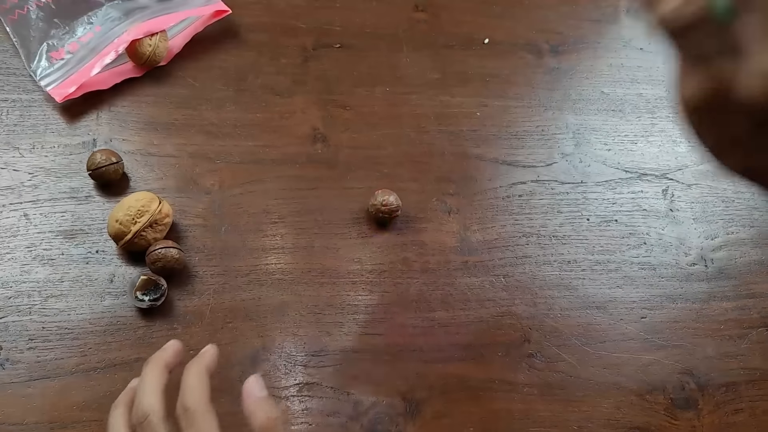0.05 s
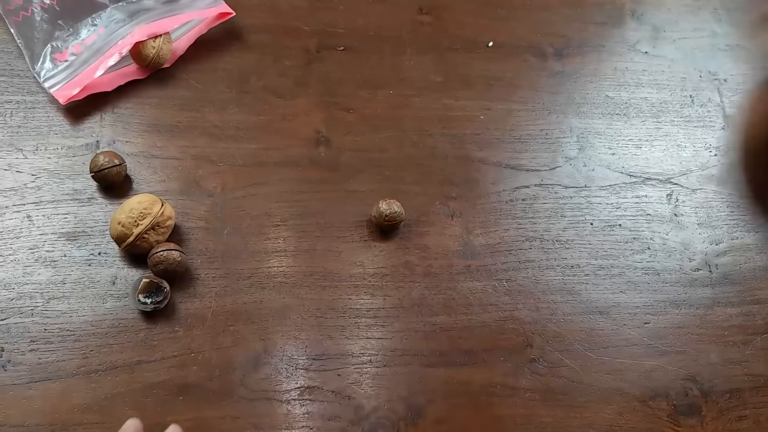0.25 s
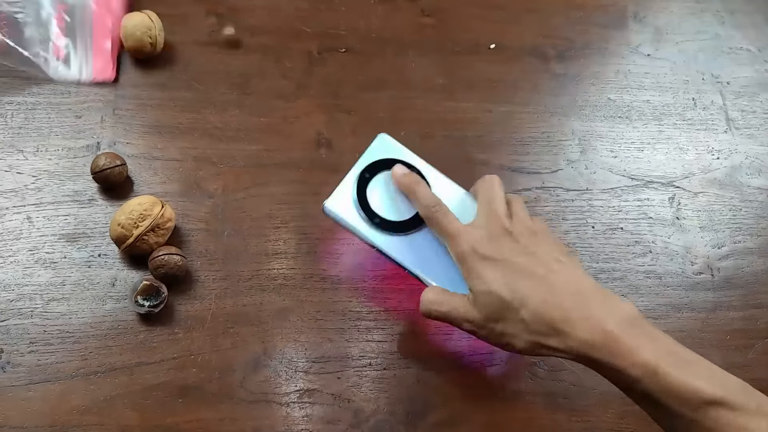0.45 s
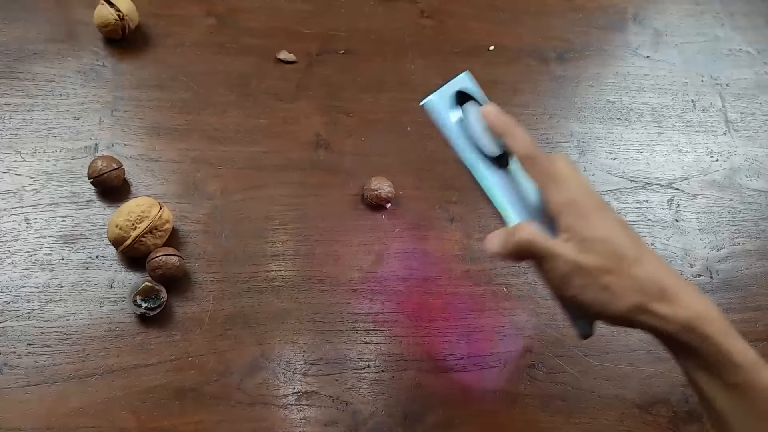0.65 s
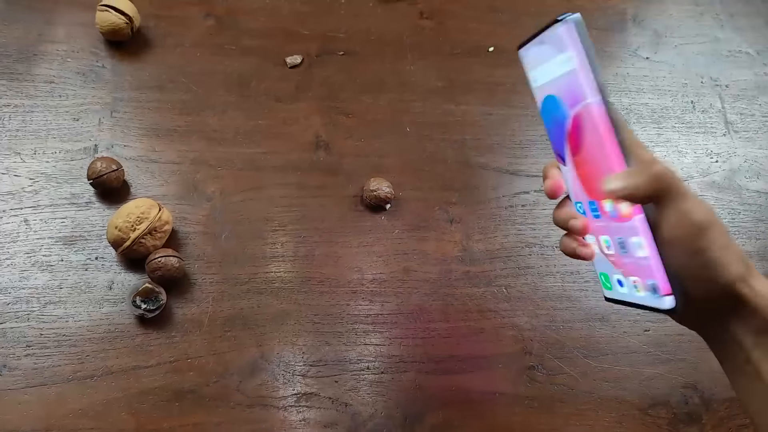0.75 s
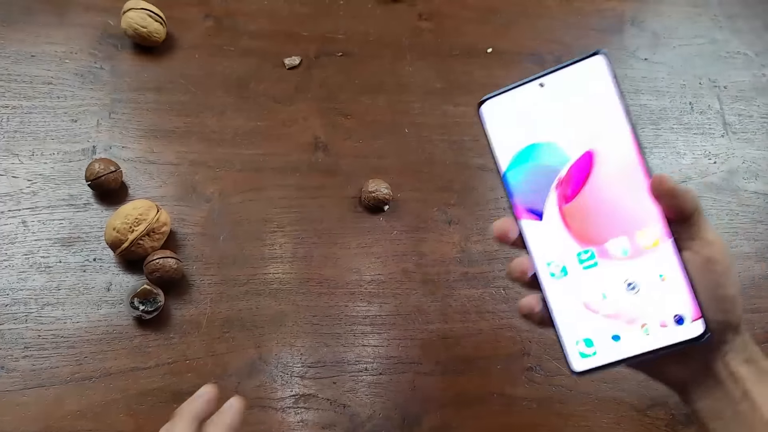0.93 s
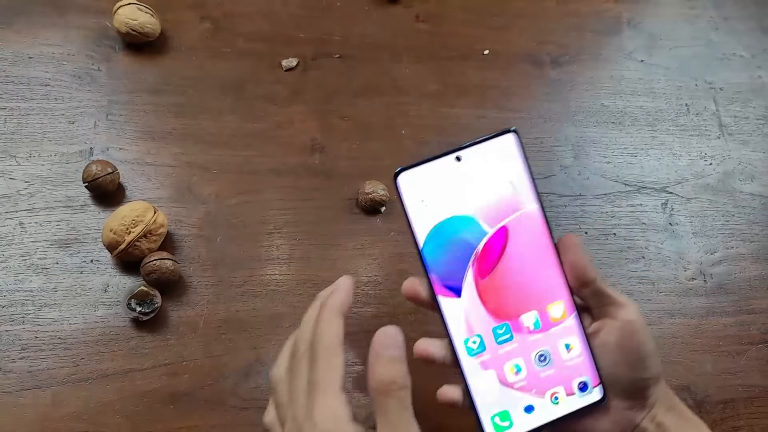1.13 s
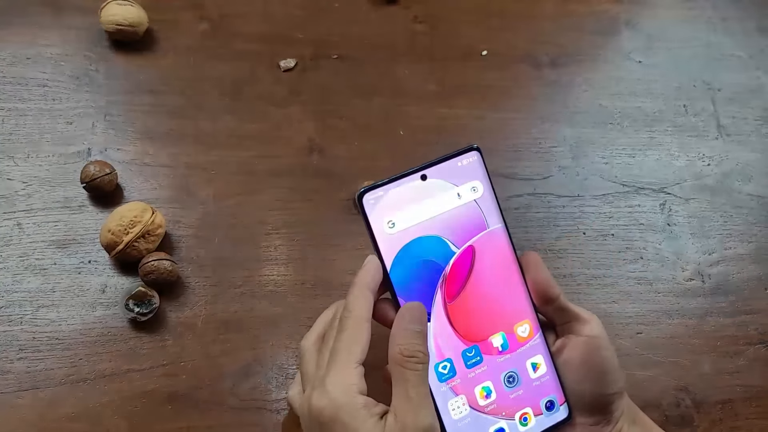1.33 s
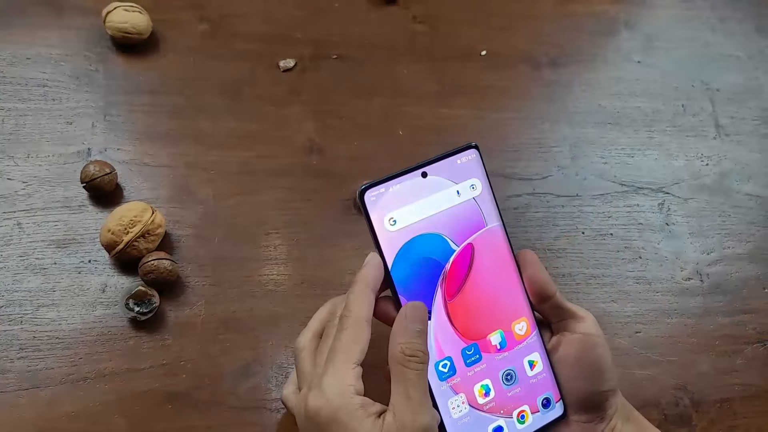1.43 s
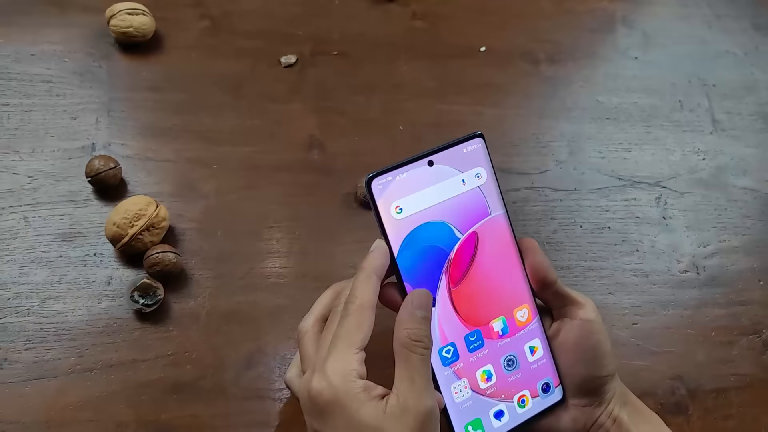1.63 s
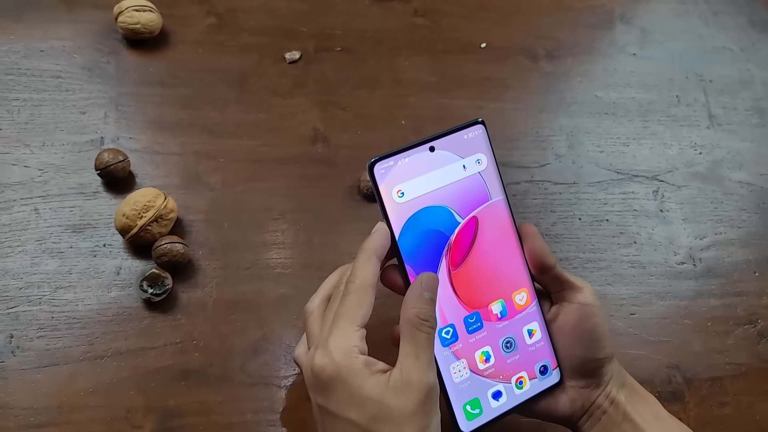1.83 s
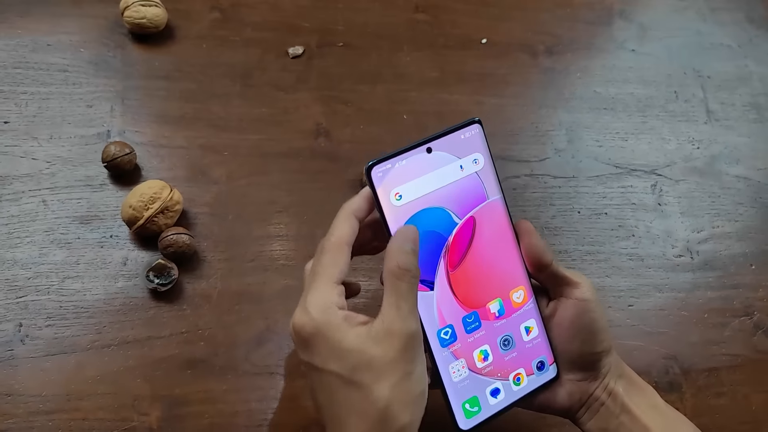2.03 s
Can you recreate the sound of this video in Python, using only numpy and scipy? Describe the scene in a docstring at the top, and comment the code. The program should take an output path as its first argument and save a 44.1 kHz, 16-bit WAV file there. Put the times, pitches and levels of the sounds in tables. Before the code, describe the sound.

A walnut cracks loudly at about 0.5 seconds as a phone slams onto it, after a few faint handling taps. The wooden table booms and the hard-walled room echoes briefly. From 0.7 to 1.7 seconds, shell bits skitter away with bright clicks, pinging off thin metal at 1.5 and more softly at 1.7 seconds. Light finger taps on the phone and a faint low hum of room noise lie underneath.

```python
"""In a hard-walled room, a phone is slammed screen-down on a walnut on a wooden table.
The shell cracks and the table booms; a limiter turns the sound down, then lets the echo swell back.
Bits of shell skitter away with bright clicks; one seems to hit something metal twice, which rings.
Fingers tap the phone, and a low wash of noise lies under it all."""
import sys
import numpy as np
from scipy import signal
from scipy.fft import rfft, irfft
from scipy.io import wavfile
from scipy.ndimage import uniform_filter1d

SR = 44100
rng = np.random.default_rng(int(sys.argv[2]) if len(sys.argv) > 2 else 0)


def transcribe(u):
    """Save the signal u as a 16-bit wav file named by the first command-line argument.

    u: samples, shape (n,) or (channels, n), limited to [-1, 1]; the rate is SR.
    q: integer samples, one column per channel.
    """
    v = np.clip(np.atleast_2d(u).T, -1, 1)
    q = np.round(v * 32767).astype(np.int16)
    wavfile.write(sys.argv[1], SR, q)


N = 91639

# Dull pushes as the phone comes down and meets the nut: t/s, level/dB, f/Hz
PHONE_PUSHES = [(0.4462, -24, 169), (0.4538, -24.5, 168), (0.4584, -1, 306)]
# The shell gives way and the phone lands: t/s, level/dB
CRACK_HITS = [(0.4612, 0), (0.4645, -3), (0.4790, -11)]
# The crack close by: f/Hz, level/dB, fade/s (a fade is the time to die away by 60 dB)
CRACK_TONE = [(39.6, 19, 0.064), (165.3, 45.5, 0.054), (300, 44.5, 0.24), (430, 52.5, 0.037),
              (800, 42.5, 0.042), (1480, 38, 0.39), (2300, 34.5, 0.1), (2890, 43, 0.072),
              (4620, 40.5, 0.033), (5890, 20, 0.046), (8000, 25, 0.044), (11000, 17.5, 0.023),
              (16000, 4, .04)]
# Notes at which the table and room boom: f/Hz, level/dB, fade/s
BOOM_NOTES = [(60.57, -13.5, 0.75), (66.77, -20, 0.84), (113.4, -3, 0.4), (148.8, -2, 0.3), (190, -3, 0.19),
              (228.1, -2, 0.36), (335, -5, 0.28), (423.8, -2, 0.18), (460, -8.5, 0.4), (580, 16, 0.053),
              (675.6, -5.5, 0.28), (855, -2.5, 0.28), (981, -8.5, .4)]
# The crack thrown into the room: f/Hz, level/dB
SLAM_ECHO_TONE = [(30, 6), (100, 44.5), (250, 44.5), (500, 45), (900, 45), (1600, 43.5), (2400, 35),
                  (4400, 35), (5700, 17.5), (9000, 17), (13000, 1), (16000, -20.5)]
# How long its echo lasts: f/Hz, fade/s
SLAM_ECHO_FADES = [(60, .45), (250, .41), (700, .39), (1500, .38), (3500, .41), (8000, .41), (15000, .35)]

def slam():
    """The phone pushes on the nut, then the shell bursts and the table booms."""
    slam_s = 0.461
    near, far, t = np.zeros(N), np.zeros(N), np.arange(N) / SR
    for start, db, hz in PHONE_PUSHES:
        spread = (np.pi * hz * (t - start)) ** 2
        near += amp(db) * (1 - 2 * spread) * np.exp(-spread)  # one smooth pulse
    crack = np.array(CRACK_TONE)
    levels, fades = crack[:, :2], crack[:, ::2]
    for start, db in CRACK_HITS:
        add(near, start, amp(db) * colour(fading_noise(fades), lambda f: look_up(levels, f)))
    add(near, slam_s, ringing(BOOM_NOTES))
    add(far, slam_s, colour(signal.unit_impulse(SR // 4), lambda f: look_up(SLAM_ECHO_TONE, f)))
    return near + echo(far, SLAM_ECHO_FADES)

# Four pitches that shape each click: f/Hz
CHIP_BANDS = [1200, 3600, 8000, 13000]
# Bits of shell landing: t/s, level/dB at each of the four pitches, level/dB of the direct sound
CHIP_LANDINGS = [(0.7043, -20, -27, -43, -64, 19), (0.781, -32, -39, -24, -39, -22),
                 (0.8245, -41, -49, -8.5, -33.5, -5.5), (0.9445, -10, -7.5, -7, -18, -17),
                 (0.9548, -33, -48.5, -1, -19.5, -3), (1.1292, -4.5, -0.5, -2.5, -35, -5.5),
                 (1.1387, -6.5, -17, -43, -46, -3), (1.1949, -43, -8.5, 2, -14, -4),
                 (1.1965, -19, -12, 1.5, -9, 1), (1.208, -43, -3, -31, -26, 3),
                 (1.4107, -18, -20, -14.5, -31.5, -6), (1.4223, -36, -21, -21, -40, -2),
                 (1.6780, -8, -17, -6, -21.5, -7.5)]

def shell_chips():
    """Bits of shell click down some way off, too small to give out bass; the very top is missing too."""
    low_hz, top_hz = 569.7, 14200
    near, far = np.zeros(N), np.zeros(N)
    for start, *bands_db, direct_db in CHIP_LANDINGS:
        def tone_db(f):
            loss_db = 10 * np.log10(1 + (low_hz / (f + 1)) ** 4 + (f / top_hz) ** 60)
            return look_up(list(zip(CHIP_BANDS, bands_db)), f) - loss_db
        click = colour(burst(fade_s=0.024), tone_db)
        add(near, start, amp(direct_db) * click)
        add(far, start, click)
    return near + echo(far, ROOM_FADES)

# A bit of shell hits metal: t/s, clack level/dB, ring level/dB, spot hit (0 to 1)
METAL_HITS = [(1.5080, -1.5, -21.5, 0.05), (1.5165, -5.5, -1, 0), (1.7144, -12.5, -13, 0.94)]
# The tone of the clack: f/Hz, level/dB
CLACK_TONE = [(300, -21), (700, 6), (1050, -4), (1600, 11.5), (2100, 8), (2700, 13), (4100, 16),
              (5300, 4.5), (6500, 13), (9000, 7), (12000, -8), (16000, -34)]
# The metal's own notes: f/Hz, level/dB at spot 0, level/dB at spot 1, fade/s
METAL_NOTES = [(688, -39, -48, .62), (761, -43, -50, .5), (1150, -47, -52, .5), (1423, -46, -43, .6),
               (1472, -43, -42, .5), (1497, -39, -33, .55), (1765, -43, -43, .8), (1936, -43, -39, .75),
               (2464, -46, -48, 1.2), (2480, -45, -44, 1.3), (2516.5, -36, -44, 1.15),
               (2528, -39, -43, 1.0), (2546, -36, -42, 1.0), (2565, -44, -44, .9), (2632, -42, -46, 1.2),
               (2749, -47, -33, .6), (2769, -47, -31, .55), (3242, -40, -42, .5), (3600, -39, -43, .35),
               (3962, -35, -38, .42), (4309, -37, -40, .35), (6297, -41, -38, .45), (6373, -36, -41, .5),
               (6396, -38, -42, .45), (6549, -37, -42, .5), (11820, -50, -60, .3)]

def metal():
    """Thin metal clacks and rings. Close notes waver together; each spot hit favours other notes."""
    rise_s = 0.0054
    clack, ring = np.zeros(N), np.zeros(N)
    rise = 1 - np.exp(-np.arange(N) / SR / rise_s)
    for start, clack_db, ring_db, spot in METAL_HITS:
        add(clack, start, amp(clack_db) * colour(burst(fade_s=0.059), lambda f: look_up(CLACK_TONE, f)))
        notes = [(hz, np.interp(spot, [0, 1], spots_db), fade) for hz, *spots_db, fade in METAL_NOTES]
        add(ring, start, amp(ring_db) * rise * ringing(notes))
    near = amp(-10.5) * clack + amp(2.5) * ring
    return near + echo(clack + amp(-15.5) * ring, ROOM_FADES)

# Ticks and taps close by (finger taps and bumps, plus two tiny shell ticks before the crack): t/s, level/dB,
# middle f/Hz, width/octaves
CLOSE_TICKS = [(0.004, -8, 330, 1.46), (0.243, 0, 580, 0.23), (0.3650, -15.5, 2130, 0.53),
               (0.4292, -29.5, 6700, 0.41), (0.4462, -17, 4630, .8), (0.9032, -9.5, 1480, 0.82),
               (1.2800, -7.5, 2980, 0.14), (1.3470, -10.5, 3060, .3), (1.3490, -14, 890, .8)]

def close_ticks():
    """Handling the phone makes small ticks and bumps, and just before it bursts the shell gives two tiny dry
    ticks; all have little echo."""
    near = np.zeros(N)
    for start, db, hz, width in CLOSE_TICKS:
        def tone_db(f):
            distance = np.log2((f + 1) / hz) / width
            return db - 20 * np.log10(1 + .5 * distance ** 4)
        add(near, start, colour(burst(fade_s=.02), tone_db))
    return near + amp(-7) * echo(near, ROOM_FADES)

# How long the room echoes: f/Hz, fade/s
ROOM_FADES = [(60, 0.67), (250, 0.85), (700, 0.95), (1500, 0.75), (3500, 0.45), (8000, 0.31), (15000, 0.24)]

def echo(x, fades):
    """Sound bounces between the hard walls and blurs into a fading tail."""
    build_s = 0.0026
    tail = fading_noise(fades)
    build = 1 - np.exp(-np.arange(len(tail)) / SR / build_s)
    return signal.fftconvolve(x, tail * build)[:N]

# The tone of the background: f/Hz, level/dB
BACKGROUND_TONE = [(15, -44), (25, -9.5), (157, -10), (249, -5), (575, -12), (659, -13), (1160, -19.5),
                   (1400, -23.5), (1790, -28), (3080, -35), (4250, -31.5), (4740, -42.5), (16000, -66.5)]
# Its loudness over time: t/s, level/dB
BACKGROUND_LEVEL = [(0, -51), (0.35, -51), (0.9, -56), (1.25, -55), (1.5, -53.5), (2.05, -51)]

def background():
    """A low wash of noise that sinks a little and comes back."""
    tone = amp(look_up(BACKGROUND_TONE, np.fft.rfftfreq(N, 1 / SR)))
    wash = irfft(rfft(rng.standard_normal(N)) * tone, N)
    level_db = np.interp(np.arange(N) / SR, *np.transpose(BACKGROUND_LEVEL))
    return wash / wash.std() * amp(level_db)

def amp(db):
    """Turns decibels into a number to multiply by."""
    return 10 ** (np.asarray(db) / 20)

def look_up(points, hz):
    """Reads between (f/Hz, value) points, with octaves evenly spaced."""
    f, value = np.transpose(points)
    return np.interp(np.log(hz + 1), np.log(f + 1), value)

def add(mix, start_s, sound):
    """Mixes a sound in at the given time."""
    part = mix[max(round(start_s * SR), 0):][:len(sound)]
    part += sound[:len(part)]

def colour(x, db_at):
    """Turns each pitch up or down by db_at(f), with nothing sounding early."""
    size = 4096
    hz = abs(np.fft.fftfreq(size, 1 / SR))
    log_gain = np.log(amp(np.maximum(db_at(hz), -100)))
    response = np.fft.ifft(np.exp(np.conj(signal.hilbert(log_gain)))).real
    return signal.fftconvolve(x, response[:size // 2])[:len(x)]

def burst(fade_s):
    """A quick spray of tiny cracks, equally strong at all pitches."""
    t = np.arange(SR // 4) / SR
    fade = amp(-60 * t / fade_s)
    noise = rng.standard_normal(len(t)) * fade
    even = irfft(np.exp(1j * np.angle(rfft(noise))), len(t))
    spray = even * np.sqrt(fade)
    return spray / np.linalg.norm(spray)

def fading_noise(fades):
    """Noise in which every pitch has the same energy but its own fade time."""
    hz, t, bands = signal.stft(rng.standard_normal(SR), SR, nperseg=256)
    rate = np.log(1000) / look_up(fades, hz)[:, None]
    faded = bands * np.exp(-rate * t) * np.sqrt(2 * rate / SR)
    return signal.istft(faded, SR, nperseg=256)[1][:SR]

def ringing(notes):
    """The pure, fading notes of something struck."""
    t = np.arange(N) / SR
    return sum(amp(db - 60 * t / fade) * np.sin(2 * np.pi * hz * t) for hz, db, fade in notes)

def scene():
    """All the sounds together, in one channel."""
    return (slam() + shell_chips() + close_ticks() + metal() + background())[None]

def record(dry):
    """A limiter ducks at once and recovers steadily; deep bass, peaks and the very top are trimmed."""
    limit_db, recover_db_per_s, sense_s = -6.5, 135, .006
    low_hz, top_hz, ceiling = 45.4, 15800, .95
    power = uniform_filter1d(dry[0] ** 2, int(sense_s * SR))
    level_db = 10 * np.log10(abs(power) + 1e-12)
    fall_db = np.arange(N) / SR * recover_db_per_s
    held_db = np.maximum.accumulate(level_db + fall_db) - fall_db
    duck_db = np.maximum(held_db - limit_db, 0)
    x = dry / amp(uniform_filter1d(duck_db, size=40))
    x = signal.sosfilt(signal.butter(2, low_hz, "high", fs=SR, output="sos"), x)
    x = x / (1 + (x / ceiling) ** 4) ** (1 / 4)  # rounds off the peaks
    top_cut = signal.firwin(255, top_hz, window=("kaiser", 9), fs=SR)
    return signal.oaconvolve(x, top_cut[None], "same")

dry = scene()
out = record(dry)
transcribe(out)
```